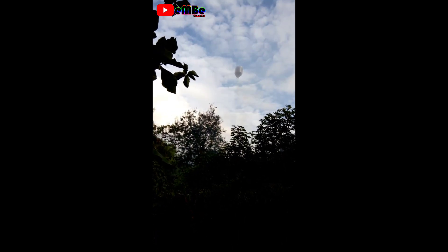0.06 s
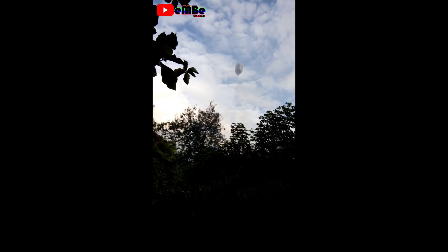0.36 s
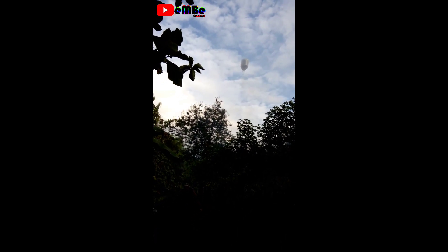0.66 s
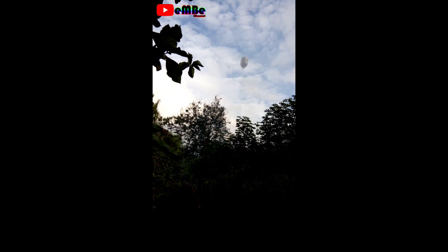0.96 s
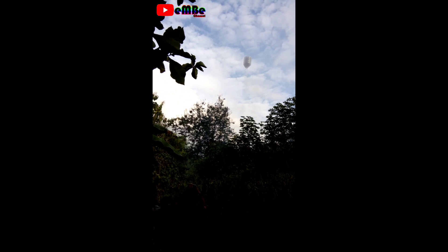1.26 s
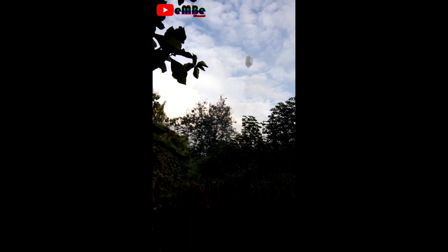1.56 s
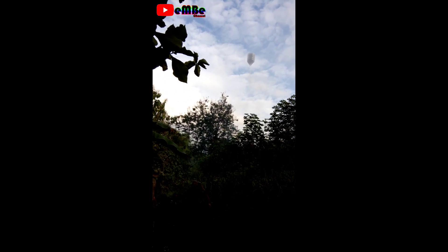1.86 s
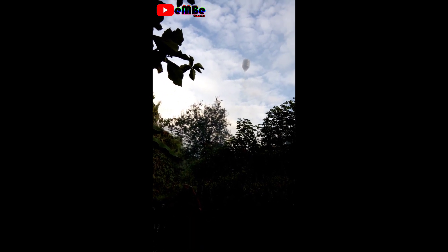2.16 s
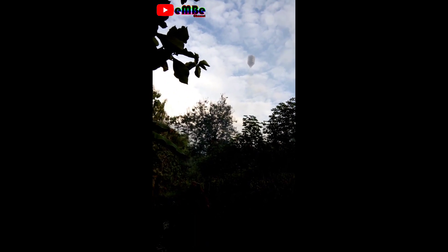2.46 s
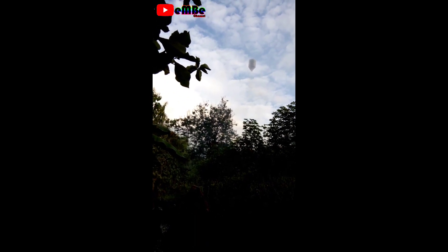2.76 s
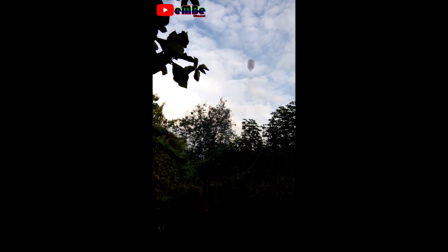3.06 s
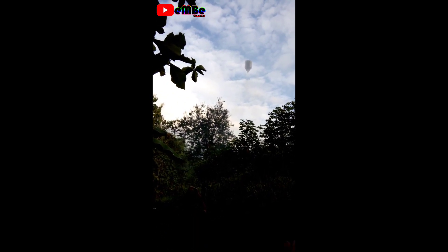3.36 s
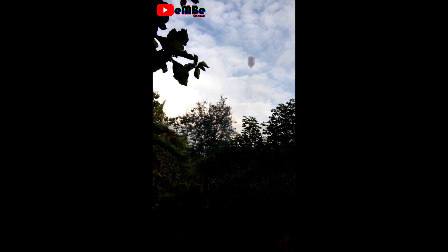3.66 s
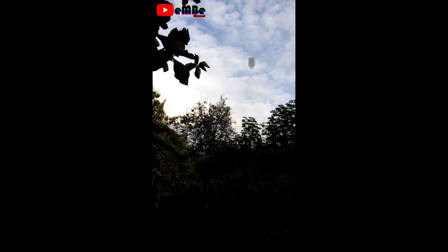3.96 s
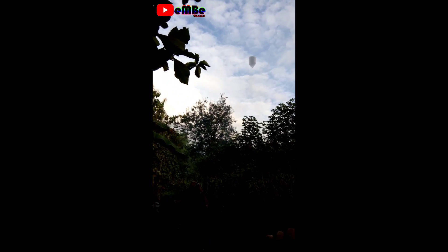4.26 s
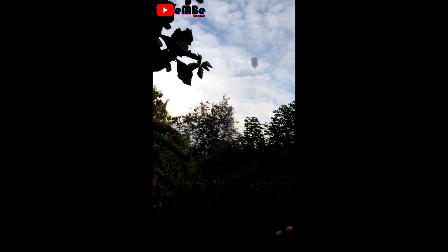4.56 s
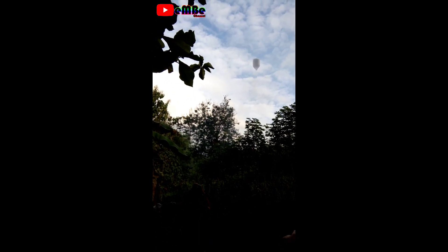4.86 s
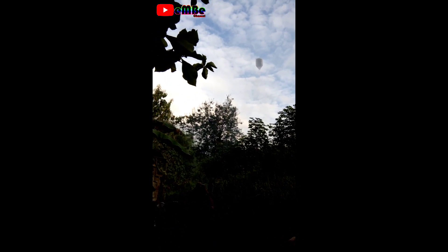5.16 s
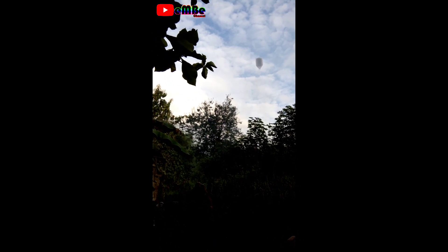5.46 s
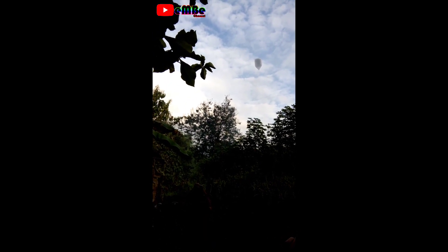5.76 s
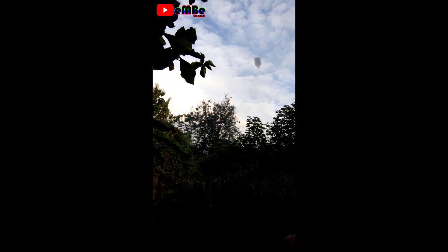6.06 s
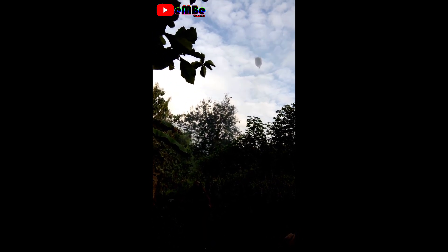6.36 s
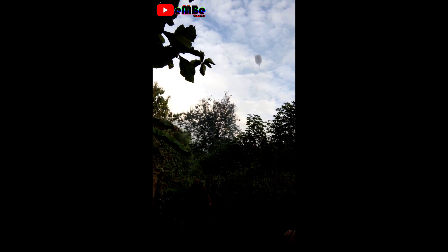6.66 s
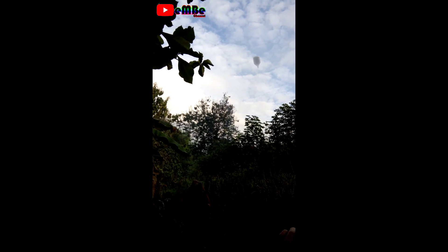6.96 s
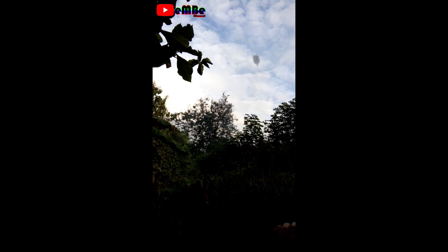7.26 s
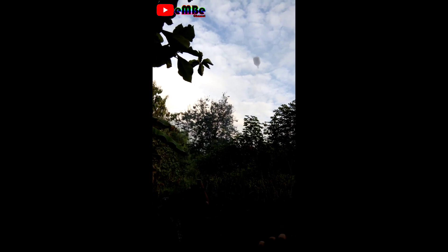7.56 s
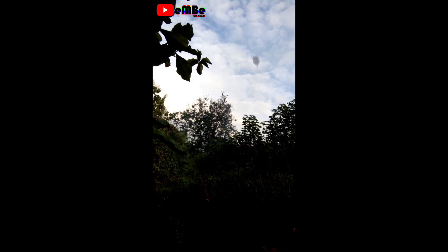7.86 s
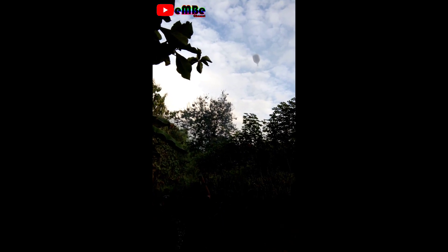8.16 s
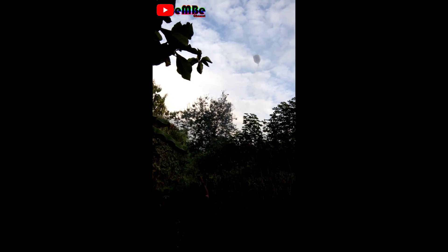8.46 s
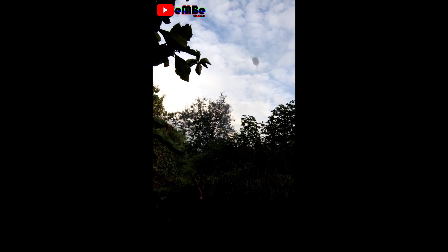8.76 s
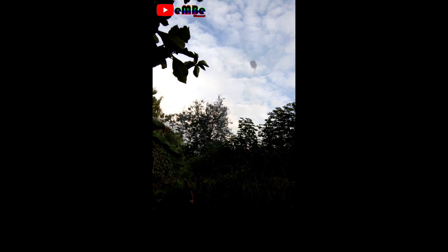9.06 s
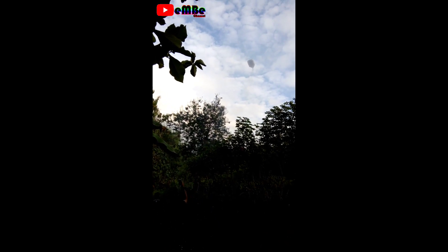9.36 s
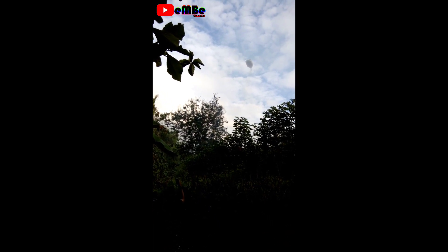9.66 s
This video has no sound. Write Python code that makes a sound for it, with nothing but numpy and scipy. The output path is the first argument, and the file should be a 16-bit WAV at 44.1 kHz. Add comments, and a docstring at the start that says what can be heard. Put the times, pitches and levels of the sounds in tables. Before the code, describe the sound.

Sharp firecracker bangs come one after another outdoors, several a second, with an irregular rhythm and small gaps. Some are bright cracks, others duller pops, and all trail a short wash of garden echoes. Near the end a brief pause holds a quiet sputter, then the cracking resumes. The loudest peaks distort a little, over a faint, steady rumble of air.

```python
"""Firecrackers in a garden

Strings of firecrackers go off in uneven runs, over faint outdoor air; one pause holds a soft sputter.
Each bang is a pressure wave that arrives directly and off the ground and nearby walls, then returns
as a wash of tiny echoes from trees and houses. The small microphone rings near 5 kHz and overloads."""
import sys
import numpy as np
from scipy import signal
from scipy.fft import rfft, irfft, next_fast_len
from scipy.io import wavfile

SR = 44100
rng = np.random.default_rng(int(sys.argv[2]) if len(sys.argv) > 2 else 0)


def to_wav(s):
    """Save 16-bit WAV."""
    ch = np.atleast_2d(s).T  # columns
    pcm = np.round(np.clip(ch, -1, 1) * 32767)  # PCM
    wavfile.write(sys.argv[1], SR, pcm.astype(np.int16))


N = 428652
LEAD = SR // 4   # start early: the string is already going
TIME = np.arange(-LEAD, N) / SR
USUAL_BLAST_DB, USUAL_LENGTH_MS = 16, 0.44   # an ordinary cracker


def from_db(db):
    """Turn decibels into a number to multiply by."""
    return 10 ** (np.asarray(db) / 20)


def dull(sound, cut_hz):
    """Gently turn down the treble above cut_hz."""
    memory = np.exp(-2 * np.pi * cut_hz / SR)
    return signal.lfilter([1 - memory], [1, -memory], sound + 1e-18)


def add(track, time_s, sound):
    """Mix a sound into the track at the given time."""
    start = max(LEAD + round(time_s * SR), 0)
    part = track[start:start + len(sound)]
    part += sound[:len(part)]


def noise_bands(spectrum, centres_hz):
    """Noise with the given tone, split into overlapping bands that add up to an average (rms) of 1."""
    size = next_fast_len(len(TIME))
    log_hz = np.log(np.arange(size // 2 + 1) * SR / size + 1)
    hz, db = np.transpose(spectrum)
    gain = from_db(np.interp(log_hz, np.log(hz), db))
    whole = rfft(rng.standard_normal(size)) * gain / np.sqrt(np.mean(gain ** 2))
    shares = [np.interp(log_hz, np.log(centres_hz), row) for row in np.eye(len(centres_hz))]
    return [irfft(whole * share, size)[:len(TIME)] for share in shares]


def noise(spectrum):
    """The same noise in one piece."""
    return noise_bands(spectrum, [1])[0]


def flutter(rate_hz, depth_db):
    """A volume that wanders at random."""
    drift = dull(dull(rng.standard_normal(len(TIME)), rate_hz), rate_hz)
    return from_db(depth_db * drift / drift.std())


def blast_wave(length_ms, sharp_db, front_hz=6700, crack_db=-15.5, crack_ms=0.46):
    """The air is pushed for length_ms, then sucked back; a sharper burst is steeper and cracks more."""
    age_ms = np.arange(SR // 100) * 1000 / SR
    progress = age_ms / length_ms
    pressure = dull((1 - progress) * np.exp(-progress), front_hz * from_db(sharp_db))
    crack = np.diff(rng.standard_normal(len(age_ms) + 1)) * np.exp(-age_ms / crack_ms)
    return pressure + from_db(crack_db + sharp_db) * crack


def ground_bounce(sound, delay_ms=0.9, spread_ms=0.12, share=0.1):
    """The ground returns a close copy, which gives each bang its own hollow tone."""
    lag = round(abs(delay_ms + spread_ms * rng.standard_normal()) * SR / 1000)
    return sound + share * np.pad(sound, (lag, 0))[:len(sound)]


# One row for each firecracker: (time [s], level [dB], length of the push [ms], sharpness [dB])
BANGS = [(-0.07, 18.5, 0.65, 0), (0.1923, 16, 0.41, 6), (0.2905, 17, 0.43, -8.5), (.3503, 15.5, .56, -7),
         (.7447, 20.5, 0.45, -18.5), (.906, 17, 0.43, 7.5), (1.254, 20.5, 0.56, 14.5),
         (1.544, 17.5, 0.48, 7), (1.6125, 20.5, 0.46, 9), (1.7155, 21, 0.5, 8), (1.7858, 14, 0.38, -5),
         (1.8228, 16, 0.38, 13.5), (1.9538, 14, 0.6, 5), (2.139, 12.5, .6, -3), (2.3186, 18.5, 0.44, 2),
         (2.6021, 18, 0.33, 2.5), (2.6997, 18, 0.26, 10), (2.8753, 18.5, .31, 4.5), (2.9035, 15.5, 0.48, 2),
         (3.1791, 16.5, 0.39, 4), (3.342, 10, 0.42, -3), (3.3747, 13.5, 0.38, -2), (3.417, 14, 0.49, -4),
         (3.604, 16, 0.33, -6), (3.6734, 19.5, 0.3, 3), (4.089, 14, 0.63, -3), (4.1564, 14, 0.79, 13.5),
         (4.4255, 11.5, 0.42, -5), (4.5181, 12.5, 0.61, -3), (4.807, 12.5, 0.45, 8.5),
         (4.9553, 17, 0.42, 1), (5.0455, 13.5, 0.45, 7), (5.2748, 18.5, 0.47, -3.5), (5.4906, 15.5, 0.6, 3),
         (5.572, 16, 0.47, -1), (5.7102, 14.5, 0.51, 6), (5.809, 13, 0.78, -3), (5.9096, 17.5, 0.39, 9),
         (5.934, 14, 0.45, -1), (5.9711, 17.5, 0.3, 6), (6.1096, 17, 0.42, 9.5), (6.1814, 16, .48, 4),
         (6.209, 4, .06, -2), (6.359, 18.5, 0.56, -7), (6.455, 9, 0.38, 2), (6.4753, 15.5, 0.55, -5.5),
         (6.8316, 12.5, 0.32, -7), (7.0136, 16, 0.35, 7.5), (7.4845, 17, 0.67, -0.5),
         (7.5382, 16, 0.63, -1.5), (7.5632, 13.5, 0.56, -5.5), (7.761, 8, 0.35, -4),
         (7.8133, 16, 0.47, -11), (7.8304, 7, 0.05, -1), (8.0496, 15.5, 0.34, 7.5), (8.267, 14.5, 0.48, 0),
         (9.1632, 17.5, .45, 5), (9.2111, 19.5, 0.44, 0), (9.3917, 11, .5, -3), (9.4212, 12.5, .46, -17),
         (9.5243, 11.5, 0.64, 15.5), (9.671, 15.5, 0.43, 13), (9.6898, 20, 0.68, -6.5)]


def firecrackers(wall_ms=4.677, wall_spread_ms=0.08):
    """The bangs and their separate echoes; the wall echo shifts as the crackers jump about."""
    direct, wall = np.zeros((2, len(TIME)))
    wall_delays_ms = wall_ms + wall_spread_ms * rng.standard_normal(len(BANGS))
    for (time_s, blast_db, length_ms, sharp_db), delay_ms in zip(BANGS, wall_delays_ms):
        bang = from_db(blast_db) * ground_bounce(blast_wave(length_ms, sharp_db))
        wall_db = -6.5 - 0.34 * (blast_db - USUAL_BLAST_DB)   # strong blasts lose more on the way
        add(direct, time_s, bang)
        add(wall, time_s + delay_ms / 1000, from_db(wall_db) * bang)
    echoes = dull(wall, cut_hz=1320) + nearby_echoes(direct)
    return direct + dull(echoes, cut_hz=9000)   # rough surfaces round off the sharp edge


# Echoes from surfaces around the microphone: (delay [ms], level [dB])
NEARBY_ECHOES = [(1.11, -13), (1.73, -10), (2.54, -18), (3.43, -21), (6.33, -16), (8.29, -18), (9.81, -15),
                 (12.19, -21), (13.08, -19), (14.98, -20), (18.5, -25), (30.0, -24)]


def nearby_echoes(bangs):
    """Each surface sends back a muffled copy, always after the same delay."""
    muffled = dull(bangs, cut_hz=434)
    echoes = np.zeros(len(TIME))
    for delay_ms, level_db in NEARBY_ECHOES:
        add(echoes, TIME[0] + delay_ms / 1000, from_db(level_db) * muffled)
    return echoes


def torn_casing(sound, spread=0.4):
    """The casing tears open unevenly in a millisecond or so, giving every burst a different tone."""
    size = SR // 700
    burst = spread * rng.standard_normal(size) / np.sqrt(size)
    burst[0] = 1
    return np.convolve(sound, burst / np.linalg.norm(burst))


def wash(spectrum, bands_hz, fades_s, level_db, build_s, grain_hz, grain_db, patchy_db):
    """Countless small echoes follow each bang: they build up, then die away band by band."""
    age = np.arange(int(min(0.7 * max(fades_s), 2) * SR)) / SR
    build_up = np.sqrt(1 - np.exp(-(age / build_s) ** 2))
    envelopes = build_up * from_db(-60 * age / fades_s[:, None])
    grains = flutter(grain_hz, grain_db)   # stronger echoes stand out
    bands = np.array([band * grains * flutter(rate_hz=11.8, depth_db=patchy_db)
                      for band in noise_bands(spectrum, bands_hz)])
    starts = rng.integers(0, N - 2 * SR, len(BANGS))   # each bang picks its own stretch of noise
    track = np.zeros(len(TIME))
    for (time_s, blast_db, length_ms, _), start in zip(BANGS, starts):
        echoes = np.sum(bands[:, start:start + len(age)] * envelopes, axis=0)
        # a stronger or longer blast wakes more echoes
        strength = from_db(0.77 + 0.5 * (blast_db - USUAL_BLAST_DB))
        strength *= (length_ms / USUAL_LENGTH_MS) ** 0.52
        add(track, time_s, strength * ground_bounce(torn_casing(echoes)))
    return from_db(level_db) * track


# Tone of the wash from hedges and fences close by: (frequency [Hz], level [dB])
HEDGE_TONE = [(50, -12), (100, -18.5), (220, -3.5), (400, -3), (600, 3.5), (800, -0.5), (1100, -2.5),
              (1600, -2.5), (2200, -15.5), (3500, -12), (5000, -14.5), (6500, -16), (8000, -24),
              (10000, -31), (15000, -19.5)]
# Tone of the wash from trees and houses farther off: (frequency [Hz], level [dB])
TREE_TONE = [(50, 2), (110, -4), (200, -10.5), (320, -4), (430, 0), (620, 2), (1000, -3), (1600, -4.5),
             (2500, -8), (4000, -12), (5200, -12.5), (6500, -12.5), (8000, -21), (10000, -27.5),
             (15000, -18.5)]
# How long each wash takes to fade by 60 dB: (frequency [Hz], near fade [s], far fade [s])
FADE_TIMES = [(100, 0.086, 2.9), (300, 0.19, 1.6), (723, 0.2, 1.77), (2000, 0.17, 1.07), (5030, 0.23, 0.98),
              (10000, 0.29, 0.75)]


def garden_wash():
    """Hedges and fences scatter each bang back at once; trees and houses answer later and for longer."""
    bands_hz, near_fades_s, far_fades_s = np.transpose(FADE_TIMES)
    near = wash(HEDGE_TONE, bands_hz, near_fades_s, level_db=-16.5, build_s=0.0006,
                grain_hz=300, grain_db=2.0, patchy_db=2.0)
    far = wash(TREE_TONE, bands_hz, far_fades_s, level_db=-26, build_s=0.024,
               grain_hz=150, grain_db=0.54, patchy_db=0.6)
    return near + far


# Tone of the distant outdoor air: (frequency [Hz], level [dB])
AIR_TONE = [(25, 27), (55, 4.5), (100, 4), (300, -3), (700, 0), (1500, -14.5), (4000, -25), (8000, -44),
            (15000, -37.5)]


def outdoor_air(level_db=-35.5):
    """A faint, steady rumble behind everything."""
    return from_db(level_db) * noise(AIR_TONE)


# Tone of the sputter: (frequency [Hz], level [dB])
SPUTTER_TONE = [(300, -20), (1000, 4), (2500, -8), (3500, -4), (3850, 6), (4200, -5), (5100, 4.5),
                (7000, -2), (9700, -14), (11000, -5), (15000, 2)]


def sputter(peak_s=8.515, peak_db=-36.5, rise_db_per_s=350, fall_db_per_s=400, tail_db_per_s=60):
    """A soft fizz in the longest pause: it swells, drops quickly and leaves a faint tail."""
    before, after = np.maximum(peak_s - TIME, 0), np.maximum(TIME - peak_s, 0)
    tail_db = -6 - tail_db_per_s * after
    fade_db = np.maximum(-fall_db_per_s * after, tail_db)
    return from_db(peak_db - rise_db_per_s * before + fade_db) * noise(SPUTTER_TONE)


def scene():
    """All the sounds of the garden in one channel, with the early start cut off."""
    mix = firecrackers() + garden_wash() + outdoor_air() + sputter()
    return mix[None, LEAD:]


def resonance(hz, q):
    """The feedback numbers of a filter that rings near hz; a higher q rings longer."""
    radius = np.exp(-np.pi * hz / (q * SR))
    angle = 2 * np.pi * hz / SR * np.sqrt(max(1 - 1 / (2 * q) ** 2, 0))
    return np.array([1, -2 * radius * np.cos(angle), radius ** 2])


# Broad peaks and dips in the tone after the overload: (frequency [Hz], width [Hz], boost or cut [dB])
AFTER_OVERLOAD_TONE = [(62.6, 94, -7.5), (1445, 500, 0.5), (7550, 2800, -5.5), (10000, 1200, 3.5),
                       (14260, 2600, -3.5)]


def after_overload_tone(sound):
    """Lift some frequencies and weaken others after the overload."""
    for hz, width_hz, db in AFTER_OVERLOAD_TONE:
        band = signal.lfilter(*signal.iirpeak(hz, hz / width_hz, fs=SR), sound)
        sound = sound + (from_db(db) - 1) * band
    return sound


def record(dry, ceiling=0.98, soften_hz=13000, top_hz=15500):
    """The microphone loses bass, rings in its opening and overloads; then the tone is shaped further."""
    sound = signal.lfilter([1, -2, 1], resonance(hz=205, q=1), dry)   # bass cut
    opening = resonance(hz=5152, q=4.44)
    sound = dull(signal.lfilter([opening.sum()], opening, sound), cut_hz=8100)
    # overload: the loud peaks flatten while the quieter wash passes through
    sound = sound / (1 + np.abs(sound / ceiling) ** 3.5) ** (1 / 3.5)
    sound = signal.sosfilt(signal.butter(2, soften_hz, fs=SR, output="sos"), after_overload_tone(sound))
    steep_treble_cut = signal.ellip(10, 0.1, 80, top_hz, fs=SR, output="sos")
    return signal.sosfilt(steep_treble_cut, sound)


dry = scene()
out = record(dry)
to_wav(out)
```